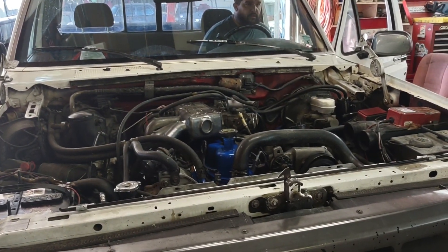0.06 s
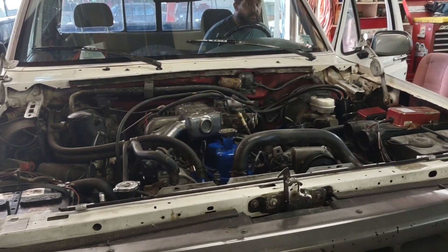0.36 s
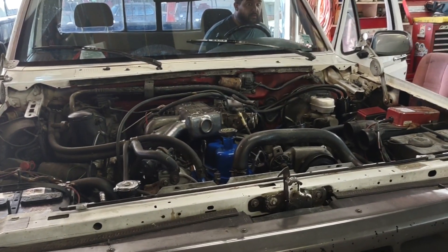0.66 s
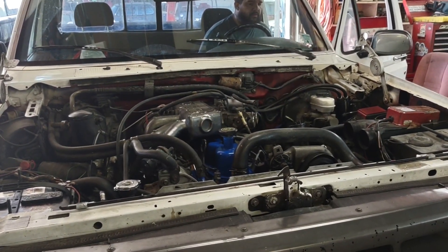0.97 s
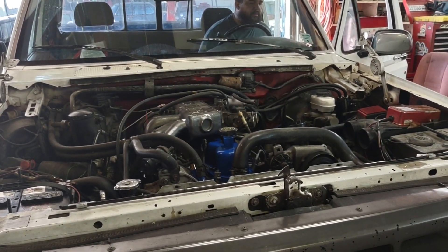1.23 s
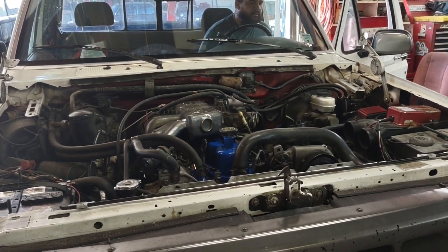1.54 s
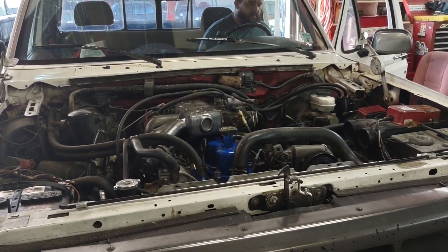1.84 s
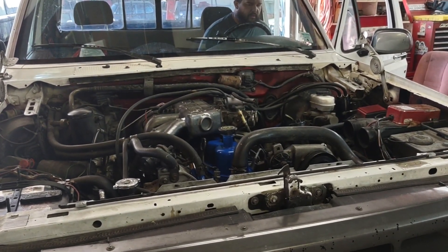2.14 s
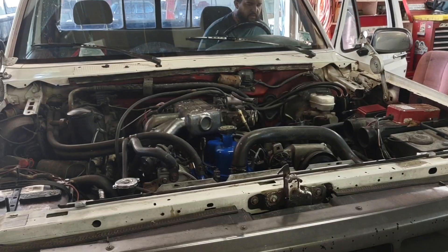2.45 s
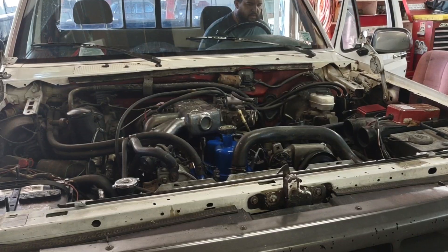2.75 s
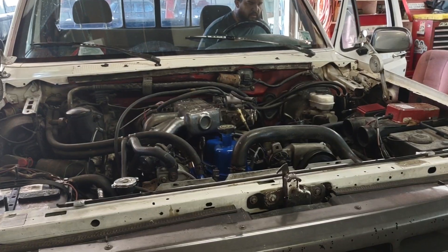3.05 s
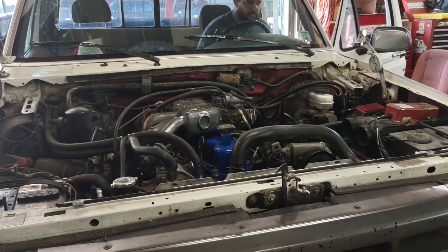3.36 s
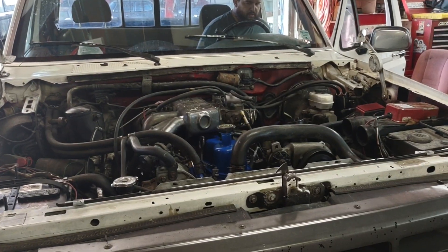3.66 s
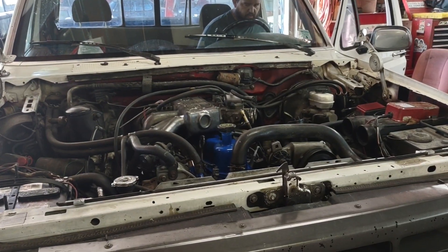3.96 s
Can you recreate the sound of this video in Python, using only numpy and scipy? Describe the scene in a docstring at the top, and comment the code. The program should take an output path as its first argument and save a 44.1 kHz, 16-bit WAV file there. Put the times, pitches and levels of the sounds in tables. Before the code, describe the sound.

An old truck engine starts, heard close over its open bay in a workshop. For the first second the starter rattles down with a falling whine. A faint click breaks the quiet at 1.3 seconds. At 1.8 the starter clacks in and grinds with brief squeaks. The engine catches around 2.4, chugs unevenly, clears into a loud roar with rushing air by 3.3, and revs higher from 3.7.

```python
"""A starter motor rattles down from a failed try, heard over the open bay of an old truck in a workshop.
Something clicks, then the solenoid throws the pinion in and the starter grinds, its gear teeth whining.
The engine catches, stumbles up to speed with uneven firings, clears into a steady roar and is revved
higher. Firings ring the exhaust pipe, valve gear and block clatter, fan and intake air rush.
Faint room air and a machine hum lie underneath."""
import sys
import numpy as np
from scipy import signal
from scipy.fft import rfft, irfft
from scipy.io import wavfile

SR = 44100
rng = np.random.default_rng(int(sys.argv[2]) if len(sys.argv) > 2 else 0)


def wav_record(signal):
    """Record a signal, one row per channel, as 16-bit PCM in the file named by sys.argv[1]."""
    frames = np.transpose(np.atleast_2d(signal))
    bounded = np.clip(frames, -1, 1)
    # unit amplitude maps onto the largest positive 16-bit level
    quanta = np.round(bounded * 32767).astype(np.int16)
    wavfile.write(sys.argv[1], SR, quanta)


N = 176400

# Each row: time in seconds, crankshaft turns per second.
CRANK_SPEED = [(2.17, 14), (2.4, 38), (2.5, 45.3), (3.08, 47), (3.17, 42), (3.28, 46.7), (3.674, 48.4),
               (3.718, 49.8), (3.788, 55.9), (3.894, 61.8), (4.0, 66.3)]
CHUG_KNOCK, BEAT_DEPTH, BEAT_DECAY_FIRINGS = 0.6, 0.9, 0.73


def engine():
    """Two firings per crank turn drive the exhaust and pulse the clatter and the intake."""
    speed = curve(CRANK_SPEED) * (1 + 0.001 * walk(17))
    turns = np.cumsum(speed) / SR
    chug, swell = chugs()
    beat = 1 + CHUG_KNOCK * swell + BEAT_DEPTH * np.exp(-(2 * turns % 1) / BEAT_DECAY_FIRINGS)
    bay = clatter(beat) + rushing_air() + intake(beat)
    return bay + chug + uneven_firings(speed, turns) + crank_orders(speed, turns)


# Each row: time in seconds, uneven firing level in dB, crank order level in dB.
FIRING_LEVELS = [(2.17, -43, -80), (2.33, -49, -55), (2.41, -22.5, -29), (2.55, -22, -23.5),
                 (2.8, -18, -21), (3.14, -15, -22), (3.34, -24.5, -14), (3.63, -37, -15), (3.73, -26, -20),
                 (3.86, -19, -12), (3.94, -34.5, -12), (4.0, -20, -16)]
# Each row: frequency in Hz, exhaust pipe gain in dB.
PIPE_RESPONSE = [(25, -30.5), (56, -32), (71, 7.5), (93, -4.5), (100, 8.5), (107, 9), (122, -7),
                 (139, -2.5), (158, -5.5), (173, 1.5), (191, -1), (212, -11), (233, 3), (252, 2),
                 (268, -13.5), (330, -21.5), (390, -11), (480, -22.5), (600, -25), (2000, -62)]
CYLINDER_DB, FIRING_SCATTER_DB, FIRING_JITTER_S = [-2.5, -2.5, 0, -10], 1.5, 0.0009


def uneven_firings(speed, turns):
    """Four unequal cylinders thump the pipe, each pulse a little off in size and time."""
    onsets = np.flatnonzero(np.diff(np.floor(2 * turns)))
    size_draw, time_draw = rng.standard_normal((len(onsets), 2)).T
    sizes = undb(np.resize(CYLINDER_DB, len(onsets)) + FIRING_SCATTER_DB * np.clip(size_draw, -2, 1))
    jitter = (FIRING_JITTER_S * SR * time_draw).astype(int)
    pulses = np.zeros(N)
    pulses[np.clip(onsets + jitter, 0, N - 1)] = sizes
    # Minimum phase: the pipe rings only after a pulse.
    cepstrum = irfft(np.log(response(PIPE_RESPONSE, bins())))
    pipe = np.exp(rfft(2 * cepstrum[:N], 2 * N) - cepstrum[0])
    thumps = shape(unit(pulses) + 0.19 * noise(), pipe)
    running = speed > CRANK_SPEED[1][1]
    return thumps / np.std(thumps[running]) * fader(FIRING_LEVELS)


def unevenness():
    """Power share of the uneven firings in the two firing levels, 0 to 1."""
    return 1 / (1 + undb(curve(FIRING_LEVELS, column=2) - curve(FIRING_LEVELS)) ** 2)


# Each row: multiple of crank speed, dB when running evenly, dB when stumbling.
ORDERS = [(2, -3.5, -5.5), (3, -9, 3.5), (4, -4, -13), (5, -3, -5.5), (7, -3.5, -8), (10, 5, -7)]
STUMBLE_DB, STUMBLE_HZ, SHAKE_DB, SHAKE_HZ = 3, 28, 0.94, 54.4


def crank_orders(speed, turns):
    """Harmonics of the crank speed sweep the pipe resonances, fluttering more while firing is uneven."""
    stumble, roar = unevenness(), 0
    shake_db = SHAKE_DB * walk(SHAKE_HZ)
    for order, even_db, stumble_db in ORDERS:
        db = even_db + stumble * (stumble_db - even_db + STUMBLE_DB * walk(STUMBLE_HZ)) + shake_db
        gain = np.sqrt(2) * undb(db) * response(PIPE_RESPONSE, order * speed)
        roar += gain * np.sin(2 * np.pi * (order * turns + rng.random()))
    return roar * fader(FIRING_LEVELS, column=2)


# Each row: start in seconds, peak level in dB.
HARD_FIRINGS = [(2.43, -19), (2.481, -15), (2.535, -13), (2.557, -11), (2.602, -12), (2.625, -16),
                (2.679, -16), (2.735, -13.5), (2.85, -10), (2.988, -13), (3.04, -11)]
CHUG_HZ, CHUG_RISE_S = 135, 0.0065


def chugs():
    """Hard firings ring the pipe in brief pressure bursts. Returns sound and envelope."""
    sound, swell = 0, 0
    for start, db in HARD_FIRINGS:
        age = np.maximum(clock() - start, 0)
        burst = undb(db) * age / CHUG_RISE_S * np.exp(1 - age / CHUG_RISE_S)
        sound -= burst * np.sin(2 * np.pi * CHUG_HZ * age)
        swell += burst
    return sound, swell


# Each row: time in seconds, level in dB.
CLATTER_LEVEL = [(2.17, -49), (2.3, -20), (2.44, -14.5), (2.6, -17), (2.9, -17), (3.2, -15.5), (3.45, -20),
                 (3.7, -17.5), (3.9, -16.5), (4.0, -12)]
# Each row: frequency in Hz, gain in dB.
CLATTER_SPECTRUM = [(150, -16), (300, -5.5), (550, -4.5), (800, 0.5), (950, 0.5), (1150, -3.5),
                    (1350, -2.5), (1800, -7), (2350, -15.5), (2700, -10.5), (3100, -13.5), (3600, -11),
                    (4600, -17.5), (8000, -25)]


def clatter(beat):
    """Valve gear and block rattle with each firing and surge while the engine stumbles."""
    surge_db = (0.32 + 1.4 * unevenness()) * walk(53)
    impacts = grains(spread_db=3.5) * beat * undb(surge_db)
    return in_bay(impacts, CLATTER_SPECTRUM) * fader(CLATTER_LEVEL)


# Each row: time in seconds, level in dB.
AIR_LEVEL = [(2.17, -58), (2.26, -45), (2.35, -24), (2.6, -23), (2.95, -19.5), (3.15, -21.5), (3.55, -20),
             (3.64, -24), (3.78, -21.5), (4.0, -23.5)]
# Each row: frequency in Hz, gain in dB.
AIR_SPECTRUM = [(1500, 3.5), (3000, -3.5), (4000, 1.5), (5000, -3), (6100, -2), (7100, 0), (7900, 2),
                (9200, 0), (10400, -0.5), (11200, -11), (13500, -8.5), (16000, -10)]
# Each row: frequency in Hz, width in Hz, level in dB relative to the rush.
WHISTLES = [(7710, 210, -20.5), (10310, 160, -20.5)]


def rushing_air():
    """Fan and intake air hiss, with two narrow whistles."""
    rush = in_bay(grains(spread_db=1.0) * undb(walk(130)), AIR_SPECTRUM)
    whistles = sum(undb(db) * whine(hz, rough=width / hz / 2) for hz, width, db in WHISTLES)
    return (rush + whistles) * fader(AIR_LEVEL)


# Each row: time in seconds, level in dB.
INTAKE_LEVEL = [(3.1, -54), (3.3, -25.5), (3.62, -26.5), (3.74, -21.5), (4.0, -24.5)]
# Each row: frequency in Hz, gain in dB.
INTAKE_SPECTRUM = [(1500, -10.5), (2600, -15), (3200, 0), (3800, -5), (4800, -8), (6300, -9.5), (9000, -23),
                   (15000, -21)]


def intake(beat):
    """The intake rasps at the firing rate as the throttle opens."""
    return in_bay(grains(spread_db=3.5) * beat, INTAKE_SPECTRUM) * fader(INTAKE_LEVEL)


# Each row: time in seconds, gear mesh in Hz, level in dB.
GRIND_TRACK = [(1.805, 900, -26.5), (1.82, 1300, -24), (1.88, 1750, -20), (1.94, 1860, -19.5),
               (2.01, 1810, -16.5), (2.065, 1520, -17), (2.13, 1720, -19), (2.17, 1500, -22),
               (2.2, 1350, -13.5), (2.26, 1400, -14.5), (2.36, 1600, -20), (2.5, 2000, -76)]
# Each row: frequency in Hz, gain in dB.
GRIND_SPECTRUM = [(24, -48), (40, -24), (130, -19), (220, -9), (313, -11.5), (700, -7), (950, -3.5),
                  (1200, -6.5), (1650, -4), (1900, -3.5), (2280, -13.5), (2600, -7.5), (3650, -12.5),
                  (5200, -18), (6200, -15.5), (7300, -26), (10000, -27.5), (11200, -41)]
# Each row: time in seconds, level in dB.
RUMBLE_LEVEL = [(1.81, -52), (1.84, -39), (1.92, -38), (2.0, -48), (2.2, -48), (2.35, -32), (2.45, -48)]
# Each row: frequency in Hz, gain in dB.
RUMBLE_SPECTRUM = [(30, -36), (80, -3), (200, -1), (400, -10), (1000, -60)]


def cranking():
    """The loaded starter grinds and whines; the engine rumbles as it is turned over."""
    grind = in_bay(grains(spread_db=3.5) * undb(walk(170)), GRIND_SPECTRUM)
    gears = undb(-7) * whine(curve(GRIND_TRACK), rough=0.0356)
    rumble = in_bay(noise(), RUMBLE_SPECTRUM) * fader(RUMBLE_LEVEL)
    return (grind + gears) * fader(GRIND_TRACK, column=2) + rumble


# Each row: start in seconds, level in dB, decay time in seconds.
SOLENOID_BLOWS = [(1.788, -30, 0.072), (1.814, -14, 0.034)]
# Each row: frequency in Hz, gain in dB.
BLOW_SPECTRUM = [(60, -23), (300, -16), (800, -20), (1200, 10), (2200, -1.5), (3800, 3.5), (5500, -4.5),
                 (9000, -14), (15000, -33)]


def solenoid():
    """The solenoid slams the pinion in with two blows."""
    envelope = sum(undb(db) * decay(start, decay_s) for start, db, decay_s in SOLENOID_BLOWS)
    return in_bay(stereo_noise(), BLOW_SPECTRUM) * envelope


# Each row: time in seconds, level in dB.
OVERRUN_LEVEL = [(2.16, -23), (2.19, -22), (2.27, -20.5), (2.34, -15.5), (2.5, -19), (2.72, -21),
                 (2.755, -30), (3.0, -61)]
# Each row: frequency in Hz, gain in dB.
OVERRUN_SPECTRUM = [(800, -11), (1800, -3.5), (2700, 1), (3200, -7), (3650, -1.5), (5000, -4), (6200, -0.5),
                    (7200, -9), (10000, -14.5), (15000, -64)]


def overrun():
    """The engine spins the starter in a free whirr until the key is let go."""
    return in_bay(grains(spread_db=2.5), OVERRUN_SPECTRUM) * fader(OVERRUN_LEVEL)


# Each row: midpoint in seconds, length in seconds, pitch in Hz, width in Hz, level in dB.
DRIVE_SQUEALS = [(1.25, .13, 3720, 60.6, -74), (2.074, 0.059, 2553, 60, -23.5), (1.962, 0.14, 980, 40, -25),
                 (2.05, 0.095, 222, 20, -27), (2.207, 0.047, 1340, 69.5, -15.5),
                 (2.26, 0.26, 6310, 202.3, -37), (2.445, 0.2, 1021, 92.1, -19.5),
                 (2.628, 0.33, 3636, 130, -25)]


def squeals():
    """Brief squeaks and groans, mostly from the starter drive."""
    sound = 0
    for midpoint, length, hz, width, db in DRIVE_SQUEALS:
        window = np.exp(-(2 * (clock() - midpoint) / length) ** 4)
        sound += undb(db) * window * whine(hz, rough=width / hz / 2)
    return sound


# Each row: time in seconds, then fader settings in dB below 3 kHz, at 3-7 kHz and above 7 kHz.
COAST_LEVELS = [(0.0, -31.5, -36.5, -48.5), (0.07, -33, -39, -57.5), (0.18, -33, -38, -56.5),
                (0.31, -33.5, -42.5, -60.5), (0.738, -39.5, -56, -67), (0.952, -45, -64, -73.5),
                (1.058, -57, -68, -81), (1.16, -64.5, -82, -88)]
# Each row: frequency in Hz, gain in dB.
COAST_SPECTRUM = [(29, -47), (75, -9), (161, -9), (220, -12), (290, -8), (418, -12), (690, -8), (940, -5),
                  (1600, -6), (2150, -10), (2450, -7), (2900, -12), (3700, -12), (7500, -29), (9800, -27),
                  (11200, -42.5)]
# Each row: time in seconds, gear mesh in Hz.
COAST_PITCH = [(0, 3020), (.57, 1498), (.82, 947), (1.15, 294)]
WHINE_PEAK_HZ, WHINE_WIDTH_OCTAVES = 1170, 0.5


def coasting():
    """The freed starter rattles down, treble first; its falling whine swells near the bay's ringing."""
    rattle = in_bay(grains(spread_db=2.0) * undb(0.45 * walk(70)), COAST_SPECTRUM)
    low_pass = 1 / (1 + (bins() / 3000) ** 8)
    high_pass = 1 - 1 / (1 + (bins() / 7000) ** 20)
    mesh_hz = curve(COAST_PITCH)
    swell = np.exp(-(np.log2(mesh_hz / WHINE_PEAK_HZ) / WHINE_WIDTH_OCTAVES) ** 2)
    gears = undb(-4.5) * whine(mesh_hz, rough=0.039) * swell
    body = (unit(shape(rattle, low_pass)) + gears) * fader(COAST_LEVELS)
    treble = unit(shape(rattle, 1 - low_pass - high_pass)) * fader(COAST_LEVELS, column=2)
    top = unit(shape(rattle, high_pass)) * fader(COAST_LEVELS, column=3)
    return body + undb(2.0) * (treble + top)


# Each row: start in seconds, crack level in dB, ring level in dB.
CONTACTS = [(1.340, -51.5, -67), (1.346, -59, -52.5)]
# Each row: frequency in Hz, relative level in dB, T60 in seconds.
METAL_MODES = [(925, 2, 0.17), (980, -1, 0.13), (2078, -9, 0.27), (2560, -7, 0.066), (3052, -5, 0.1),
               (3170, -8, .05)]
# Each row: frequency in Hz, gain in dB.
CRACK_SPECTRUM = [(300, -20), (1200, 0), (2400, 0), (3100, 6), (4400, -4), (8000, -10), (9600, -3),
                  (11000, -18)]


def click():
    """A small metal part touches, then seats, leaving a faint tail in the shop."""
    sound = undb(-57.5) * in_bay(stereo_noise(), GRIND_SPECTRUM) * decay(CONTACTS[-1][0], decay_s=0.084)
    for start, crack_db, ring_db in CONTACTS:
        age = clock() - start
        ring = sum(undb(db) * decay(start, t60 / np.log(1000)) * np.sin(2 * np.pi * hz * age)
                   for hz, db, t60 in METAL_MODES)
        crack = in_bay(stereo_noise(), CRACK_SPECTRUM) * decay(start, decay_s=0.014)
        sound += undb(ring_db) * ring + undb(crack_db) * crack
    return sound


# Each row: frequency in Hz, gain in dB.
ROOM_SPECTRUM = [(22, -50), (48, -14), (234, -10), (448, -21), (497, -14.5), (1600, -19), (2190, -24.5),
                 (15000, -51)]
# Each row: frequency in Hz, level in dB.
HUM_TONES = [(114, -75.5), (274.5, -74)]


def shop():
    """Quiet room air and a wavering machine hum."""
    hum = sum(np.sqrt(2) * undb(db + 2 * walk(3.9)) * np.sin(2 * np.pi * hz * clock())
              for hz, db in HUM_TONES)
    return undb(-63) * unit(shape(stereo_noise(), response(ROOM_SPECTRUM, bins()))) + hum


# Each row: frequency in Hz, width in Hz, linear gain.
BAY_MODES = [(384, 5, 1), (477.5, 4.4, 1), (670, 22, 0.59), (831, 12, 0.63), (926, 25, 1), (997, 10, 1),
             (1116, 26, 0.75), (1318, 22, 1), (6100, 35, 1), (10350, 84, 0.17)]


def in_bay(x, spectrum):
    """A source takes on its spectrum and rings the engine bay; output rms 1."""
    ring = 1 + sum(gain * resonance(hz, width) for hz, width, gain in BAY_MODES)
    return unit(shape(x, response(spectrum, bins()) * ring))


# Each row: frequency in Hz, gain of the difference between the ears in dB.
STEREO_WIDTH = [(60, -31), (200, -32), (500, -9.5), (1000, -6.5), (2000, -0.5), (8000, 0.5)]
SHOP_T60_S, SHOP_ECHO_DB = 0.2, -10


def place(x, balance):
    """Bass reaches both ears alike, treble scattered; the shop adds a short tail."""
    mid = (x[0] + x[1]) / 2
    side = shape((x[0] - x[1]) / 2, response(STEREO_WIDTH, bins()))
    lean, ears = response(balance, bins()), []
    equal_power = np.sqrt(2 / (1 + lean ** 2))
    for ear, gain in ((mid + side, lean), (mid - side, 1)):
        tail = unit(noise() * decay(0.0037, SHOP_T60_S / np.log(1000))) / np.sqrt(N)
        room = 1 + undb(SHOP_ECHO_DB) * rfft(tail, 2 * N)
        ears.append(shape(ear, room * gain * equal_power))
    return np.array(ears)


def whine(hz, rough):
    """Stereo tone smeared in pitch and level, as by uneven gear teeth."""
    ears = []
    for _ in range(2):
        cycles = np.cumsum(hz * (1 + rough * walk(117.9))) / SR
        ears.append(np.sin(2 * np.pi * cycles) * (1 + 0.46 * walk(90)))
    return unit(np.array(ears))


def grains(spread_db):
    """Dense small impacts of unequal size, reaching each ear by its own paths."""
    return unit(stereo_noise() * undb(spread_db * np.clip(noise(), -3, 3)))


def walk(hz):
    """Smooth random drift, rms 1."""
    f = np.arange(N // 2 + 1) * SR / N
    return unit(irfft(rfft(noise()) * np.exp(-(f / hz) ** 2), N))


def decay(start, decay_s):
    """Sudden onset, exponential fall."""
    age = clock() - start
    return (age >= 0) * np.exp(-np.abs(age) / decay_s)


def curve(table, column=1):
    """One column of a time table, linearly interpolated."""
    rows = np.array(table)
    return np.interp(clock(), rows[:, 0], rows[:, column])


def fader(table, column=1):
    """Gain from a dB column; dies quickly outside the table."""
    outside_s = np.maximum(table[0][0] - clock(), 0) + np.maximum(clock() - table[-1][0] - .03, 0)
    return undb(curve(table, column)) * np.exp(-outside_s / 0.0051)


def response(table, hz):
    """Gain of an (Hz, dB) table at the given frequencies."""
    rows = np.array(table)
    return undb(np.interp(np.log(np.maximum(hz, 1)), np.log(rows[:, 0]), rows[:, 1]))


def resonance(hz, width_hz):
    """Band-pass response, gain 1 at the centre."""
    f = bins()
    return 1j * f * width_hz / (hz ** 2 - f ** 2 + 1j * f * width_hz)


def shape(x, gain):
    """Filter by a gain per bin."""
    return irfft(rfft(x, 2 * N) * gain)[..., :N]


def bins():
    """Bin frequencies in Hz of a padded spectrum."""
    return np.arange(N + 1) * SR / (2 * N)


def clock():
    """Sample times in seconds."""
    return np.arange(N) / SR


def noise():
    """White noise."""
    return rng.standard_normal(N)


def stereo_noise():
    """Independent white noise per ear."""
    return rng.standard_normal((2, N))


def unit(x):
    """Scale to rms 1."""
    return x / np.sqrt(np.mean(x ** 2))


def undb(db):
    """Decibels to gain."""
    return 10 ** (np.asarray(db) / 20)


# Each row: frequency in Hz, left minus right in dB.
STARTER_PAN = [(100, -2.5), (380, 1.5), (700, -2.5), (2380, -2.5), (4400, -6.5), (8100, -12.5), (15000, -1)]
ENGINE_PAN = [(60, 7), (200, 0.5), (400, 2), (700, 2), (1290, -2), (2380, 1), (4400, -4.5), (8100, -8.5),
              (15000, -2)]


def scene():
    """Starter to the right, engine in front, the shop around them."""
    starter_side = coasting() + click() + solenoid() + cranking() + overrun() + squeals()
    return place(starter_side, STARTER_PAN) + place(engine() + shop(), ENGINE_PAN)


def record(dry):
    """Clip at full scale, then low-pass at 15.6 kHz."""
    low_pass = signal.ellip(10, .2, 80, 15600, fs=SR, output="sos")
    return signal.sosfilt(low_pass, np.clip(dry, -1, 1))


dry = scene()
out = record(dry)
wav_record(out)
```